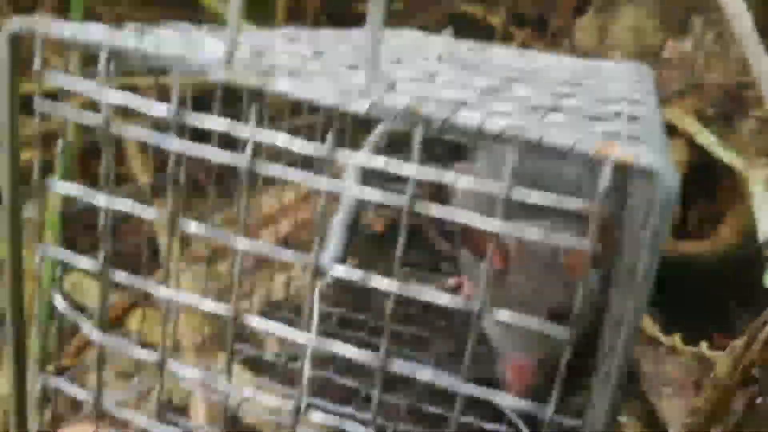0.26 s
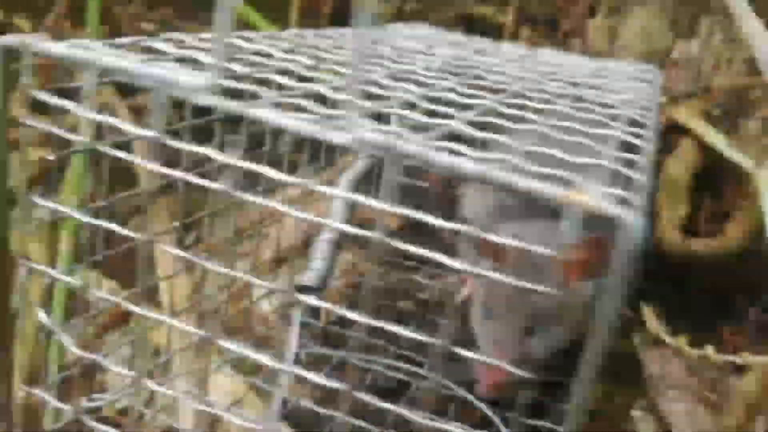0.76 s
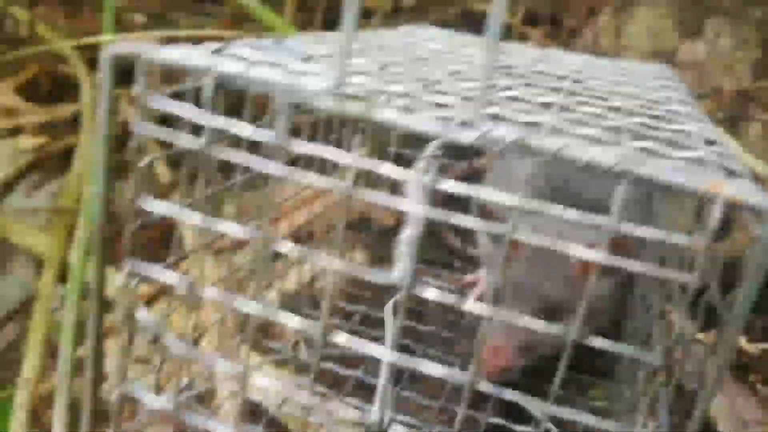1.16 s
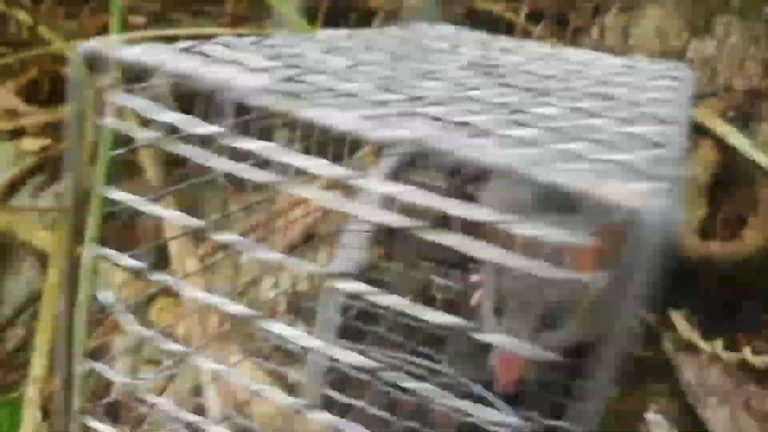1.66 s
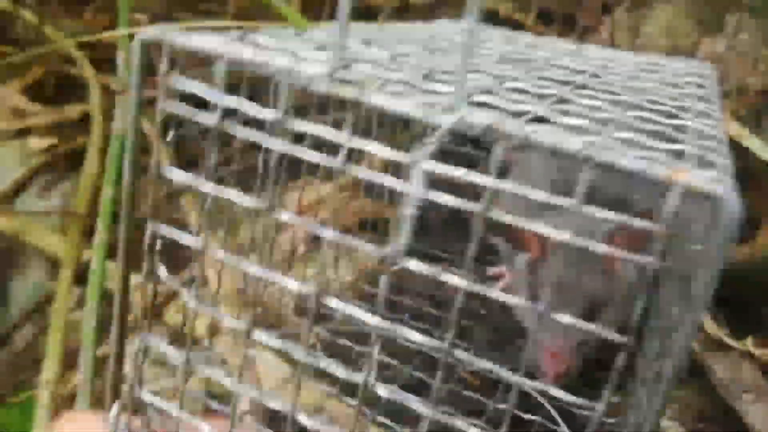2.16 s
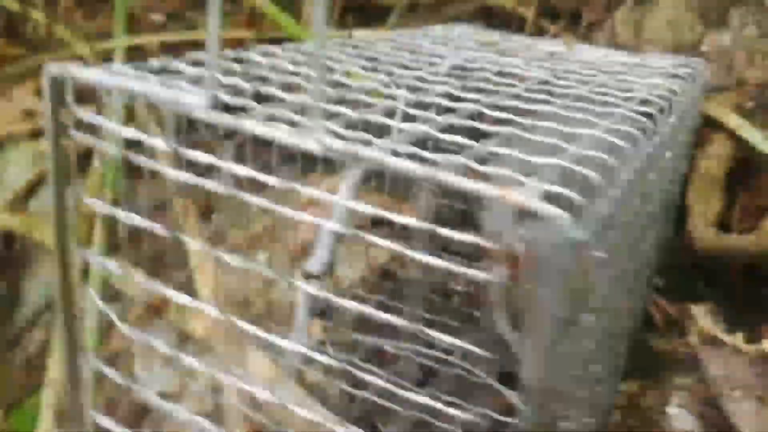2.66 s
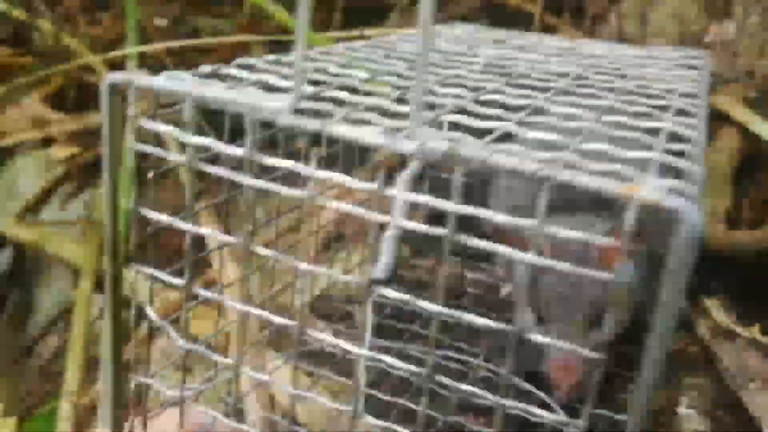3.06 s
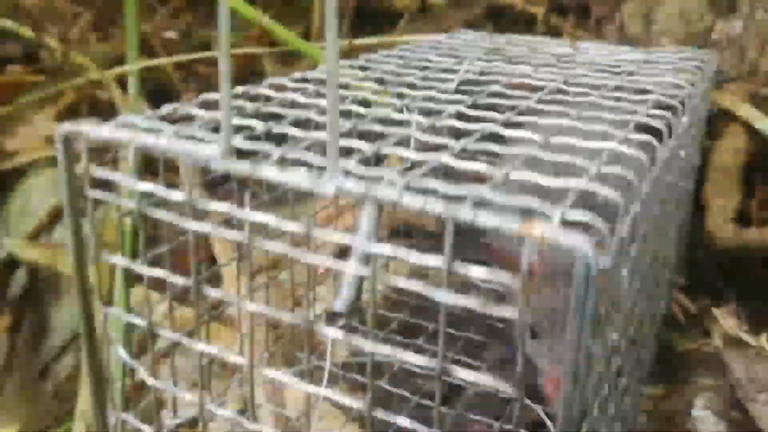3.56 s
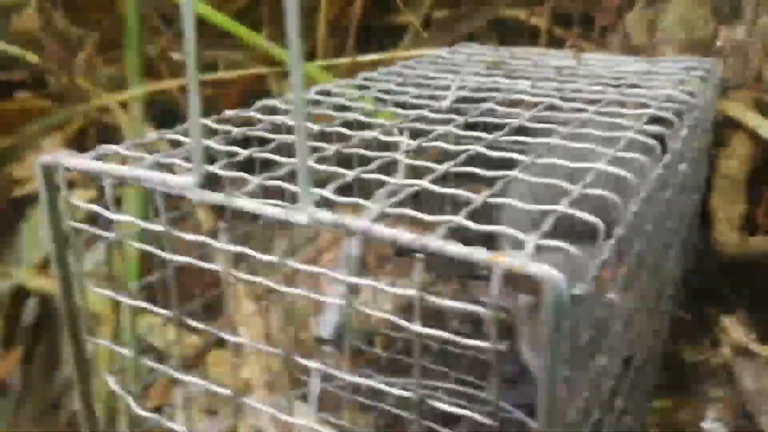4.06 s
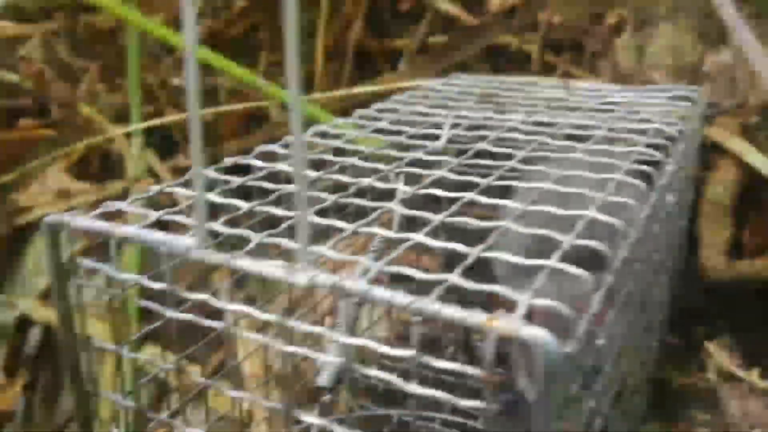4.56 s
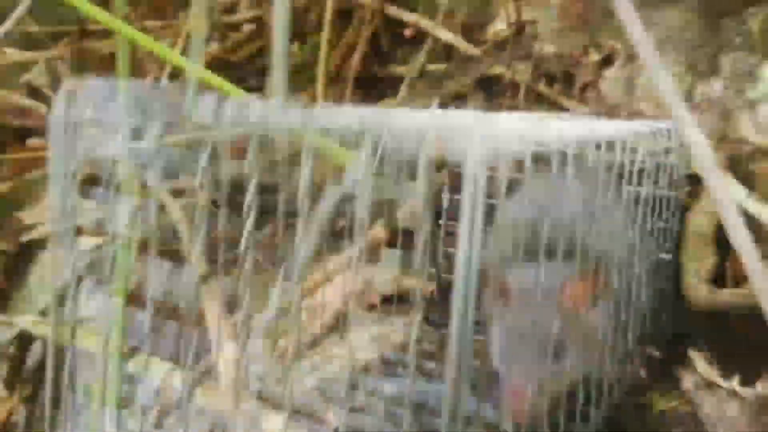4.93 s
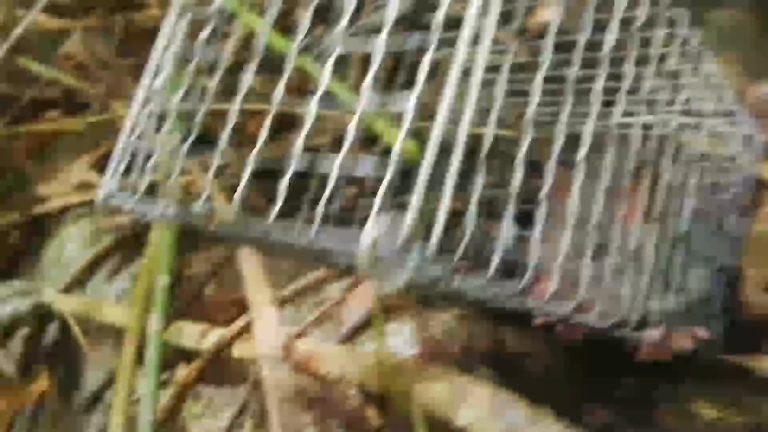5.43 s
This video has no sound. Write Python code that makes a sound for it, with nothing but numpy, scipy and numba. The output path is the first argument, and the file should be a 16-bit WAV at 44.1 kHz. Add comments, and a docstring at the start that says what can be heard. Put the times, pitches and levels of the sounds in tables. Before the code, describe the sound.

Outdoors, close to a phone microphone, a metal cage trap holding a small animal gives off irregular, bright clicks and light rattles as it slides over dry stalks. An early hard knock leads to scattered ticks, a busier patch with ringing rods and soft thuds, a brief lull, and a final loud burst of scrapes and knocks. A distant engine hums low and insects sing faintly throughout.

```python
"""A wire-mesh cage trap is tilted and dragged on dry stalks while a small animal shifts inside it.
From the start, far insects sing over a low engine hum, stalks scrape the mesh and the wires tick.
After a second the frame knocks hard; a little later one stalk rubs softly along the wires.
Past three seconds, loose rods ring among more knocks and soft thuds. After a lull, the last second
brings the loudest scraping and knocking. A phone's two microphones hear it all."""
import sys
import numpy as np
from scipy import signal
from scipy.io import wavfile
from scipy.ndimage import uniform_filter1d
from numba import njit

SR = 44100
rng = np.random.default_rng(int(sys.argv[2]) if len(sys.argv) > 2 else 0)


def master(y):
    """Save y as 16-bit WAV."""
    cut = np.clip(np.atleast_2d(y).T, -1, 1)
    pcm = np.round(cut * 32767)  # scale
    wavfile.write(sys.argv[1], SR, pcm.astype(np.int16))


N = 250929
T = np.arange(N) / SR
SIDES = np.array([[1.], [-1.]])  # left, right; "pan" below is the left level minus the right, in dB


def gain(db):
    """Turns decibels into a number to multiply by."""
    return 10 ** (np.asarray(db) / 20)


def normalize(x):
    """Scales a sound to an average power of 1."""
    return x / np.sqrt(np.mean(x ** 2))


@njit
def resonate(x, hz, width):
    """A filter that lets the pitch hz through unchanged and weakens pitches further from it."""
    out = np.empty(len(x))
    band_state, low_state = 0., 0.
    tuning, damping = np.tan(np.pi * hz / SR), width / hz
    for i in range(len(x)):
        swing = (band_state + tuning * (x[i] + 1e-18 - low_state)) / (1 + tuning * (tuning + damping))
        band_state = 2 * swing - band_state
        low_state += 2 * tuning * swing
        out[i] = damping * swing
    return out


def band(x, hz, width, passes=2):
    """Keeps a band of pitches in each channel; more passes give it steeper edges."""
    for _ in range(passes):
        x = np.array([resonate(channel, float(hz), float(width)) for channel in x])
    return x


def noise(alike):
    """Left and right noise: unrelated when alike is 0, nearly the same when it is 1."""
    common, opposite = rng.standard_normal((2, N))
    alike = np.clip(alike, -.99, .99)
    return (np.sqrt(1 + alike) * common + np.sqrt(1 - alike) * opposite * SIDES) / np.sqrt(2)


def wander(rate):
    """A smooth random curve, mostly within -1 to 1, that heads for a new value rate times a second."""
    hold = int(SR / rate)
    steps = np.repeat(rng.standard_normal(N // hold + 1), hold)
    return 1.426 * uniform_filter1d(uniform_filter1d(steps, hold), hold)[:N]


def fade(size, fade_s):
    """A curve, size samples long, that drops 60 dB in the fade time fade_s."""
    return np.exp(-np.log(1000) * np.arange(size) / SR / max(fade_s, .002))


def place(out, start_s, sound, pan_db, lag=0):
    """Mixes a sound in at start_s; the left side is shifted by lag samples."""
    for side, start in enumerate((int(start_s * SR) + lag, int(start_s * SR))):
        piece = (sound * gain(pan_db * SIDES / 2))[side, :N - start]
        out[side, start:start + len(piece)] += piece


def grains(size, rate, scatter_db, grain_s):
    """Tiny random impacts of uneven strength, about rate a second, each with a short tail."""
    timing, strength = rng.random((size, 2)).T
    hits = (timing < rate / SR) * gain(-scatter_db * np.log(1 - .93 * strength))
    return signal.lfilter([1], [1, -np.exp(-1 / (grain_s * SR))], hits)


def outdoor_air():
    """A soft outdoor rush in half-octave bands; its bass is alike on both sides."""
    # Each row: pitch in Hz, relative level in dB.
    spectrum = [(20, -16), (50, 0), (85, 4), (120, 0), (170, -7), (300, -15), (570, -30), (1100, -27),
                (2500, -26.5), (5000, -27.5), (9000, -42), (14500, -39), (16000, -40)]
    pitches, levels = np.transpose(spectrum)
    rush = 0
    for hz in 25 * 2 ** np.arange(0, 9.4, .5):
        db = np.interp(np.log(hz), np.log(pitches), levels) + 1.2 * wander(5.8)
        alike = 1.15 / (1 + (hz / 330) ** 4) - .15
        rush += gain(db) * band(noise(alike), hz, width=hz / 2.3)
    return gain(-60) * normalize(rush)


def insects():
    """A distant chorus blurs into narrow, slightly flickering bands."""
    # Each row: pitch in Hz, width in Hz, relative level in dB.
    voices = [(6406, 130, -3.5), (6667, 220, -0.5), (6920, 870, -2), (13000, 600, -28)]
    song = sum(gain(db + 1.2 * wander(49)) * normalize(band(noise(0.023), hz, width))
               for hz, width, db in voices)
    return gain(-65 + 0.6 * wander(0.86)) * normalize(song)


def engine_hum():
    """A far engine fires in a wavering low tone, with a weak tone an octave above."""
    # Each row: time in seconds, level in dB.
    loudness = [(0.0, -61), (0.05, -56.5), (0.38, -54), (0.41, -62), (1.11, -53.5), (1.14, -74),
                (1.31, -49), (1.57, -62), (1.73, -48), (1.77, -57.5), (2.06, -53), (2.19, -58),
                (3.0, -54.5), (3.04, -68), (3.15, -50.5), (3.33, -62), (3.42, -53), (3.53, -67.5),
                (3.68, -55), (3.74, -82), (3.79, -61.5), (3.96, -52), (4.12, -65.5), (4.23, -51.5),
                (4.39, -61.5), (4.63, -52.5), (4.69, -64), (5.04, -49.5), (5.09, -66), (5.48, -50),
                (5.56, -59), (5.69, -49)]
    times, levels = np.transpose(loudness)
    firing_hz = 84.4 + 0.74 * wander(1.467) + 1.42 * wander(12)
    phase = 2 * np.pi * np.cumsum(firing_hz) / SR
    tone = np.sin(phase) + gain(-19 + 4.1 * wander(4.63)) * np.sin(2 * phase)
    return np.sqrt(2) * gain(np.interp(T, times, levels) + 0.84 * wander(20)) * tone


def ground_rumble():
    """The frame rumbles as it drags over the ground."""
    # Each row: time in seconds, level in dB.
    loudness = [(0, -73.5), (.5, -77), (1.1, -61.5), (1.4, -70.5), (1.8, -65.5), (2.3, -72), (3.5, -67.5),
                (4.4, -74.5), (4.9, -65), (5.2, -58.5), (5.5, -60), (5.69, -51.5)]
    times, levels = np.transpose(loudness)
    db = np.interp(T, times, levels) + 3.85 * wander(22.984)
    bass = normalize(band(noise(0.62), hz=151, width=210))
    deep_bass = normalize(band(noise(0.77), hz=36, width=62))
    return gain(db) * (bass + 0.27 * deep_bass)


def soft_thuds():
    """The animal's feet, and the frame on the ground, make low tones that die at once."""
    # Each row: start in seconds, level in dB, pitch in Hz, pan in dB.
    thuds = [(0.728, -50, 202, -2), (1.141, -55, 175, 0), (1.788, -44, 172, 0), (1.831, -53, 290, -4),
             (3.373, -52, 190, 2), (3.512, -48, 440, 8), (3.639, -49, 262, -2), (4.592, -54, 171.5, -2),
             (4.7528, -44, 332, -2), (5.279, -46, 173, 2), (5.531, -35, 220, -1), (5.659, -55, 191, -3)]
    out, t = np.zeros((2, N)), np.arange(4000) / SR
    for start, db, hz, pan_db in thuds:
        tone = np.sin(2 * np.pi * (hz * t + 0.51 * rng.random((2, 1))))
        shape = np.minimum(t / 0.0006, 1) * fade(len(t), fade_s=0.031)
        place(out, start, 0.91 * gain(db) * tone * shape, pan_db)
    return out


def stalk_pressure(rate, grit):
    """Stalks catch and let go: a flickering push with uneven grains on top."""
    crackle = 2.6 * grit * grains(N, rate, scatter_db=6, grain_s=0.00075)
    return (5.5 + crackle) * gain(2.4 * grit * wander(90))


def sliding_stalk():
    """One stalk rubs softly along the wires and makes them sing at two pitches."""
    # In order: start, rise time, hold time and release time, all in seconds.
    timing = (2.27, .12, .2, .12)
    # Each row: pitch in Hz, width in Hz, relative level in dB.
    wire_tones = [(3630, 180, 2), (4800, 180, -1)]
    shape = np.interp(T, np.cumsum(timing), [0, 1, 1, 0])
    rub = stalk_pressure(rate=150, grit=0.21) * noise(.1)
    song = sum(gain(db) * band(rub, hz, width, passes=1) for hz, width, db in wire_tones)
    return gain(-65) * shape * normalize(song)


def drag_levels():
    """The dragging's hiss level, rasp level and pan at every sample."""
    # Each row: time in seconds, thin stalks' hiss in dB, thick stalks' rasp in dB, pan in dB.
    drag = [(0.0, -67.5, -64.5, -1), (0.41, -75, -71, -1), (0.602, -68, -70, -1.5),
            (0.731, -60, -62.5, -0.5), (0.86, -60, -61, -2.5), (0.96, -54.5, -53, -5),
            (0.985, -67.5, -61, 0), (1.008, -63, -62, -4), (1.04, -48.5, -53.5, 1),
            (1.2, -62.5, -61.5, -2.5), (1.41, -66, -71.5, 0), (1.7, -65.5, -65.5, -0.5),
            (1.839, -60, -58.5, -1.5), (1.901, -67, -71, -2), (2.001, -60, -55, -2),
            (2.162, -68.5, -72, -0.5), (2.362, -69.5, -65.5, -1), (2.622, -62.5, -60.5, 0),
            (2.77, -62, -60.5, -0.5), (2.92, -73.5, -64.5, 0.5), (3.2, -69, -72.5, -3),
            (3.33, -69.5, -59, -0.5), (3.403, -63, -63.5, 0), (3.424, -51, -58.5, -1), (3.53, -56, -58, 1),
            (3.64, -59.5, -56, -0.5), (3.84, -65.5, -64.5, -1), (4.22, -67, -64, -0.5),
            (4.423, -78, -71.5, -1), (4.88, -72, -70.5, 1), (5.01, -64.5, -53.5, 0),
            (5.13, -63, -48.5, -0.5), (5.21, -60.5, -58.5, -1.5), (5.34, -50.5, -49.5, -1),
            (5.47, -54, -55.5, -1), (5.584, -57, -52, -2), (5.6, -44, -47, -3.5), (5.69, -44, -45.5, -1)]
    times, *columns = np.transpose(drag)
    return [np.interp(T, times, column) for column in columns]


def scraping_stalks():
    """Dry stalks slip along the mesh: thin ones hiss, thick ones rasp lower down."""
    hiss_db, rasp_db, pan_db = drag_levels()
    grit = np.clip((hiss_db + 74) / 16, .15, 1)  # harder dragging crackles more
    thin, thick = stalk_pressure(rate=270, grit=grit), stalk_pressure(rate=130, grit=grit)
    both = np.sqrt(thin * thick)
    upper_hiss = gain(0.89 * wander(24.73)) * normalize(band(thin * noise(0.023), 10700, 12000))
    lower_hiss = gain(2.4 * wander(25.13)) * normalize(band(both * noise(0.027), 7500, 11000))
    hiss = gain(hiss_db) * (upper_hiss + lower_hiss) / np.sqrt(2)
    rasp_bands = [gain(4 * wander(70)) * normalize(band(thick * noise(0.018), hz, width=hz / 2))
                  for hz in (2160, 3110, 3580, 4330, 5470)]
    rasp = gain(rasp_db) * normalize(sum(rasp_bands))
    body_db = -65.5 + 0.93 * (rasp_db + 63.5) + 2.4 * wander(60)  # swells along with the rasp
    body = gain(body_db) * normalize(band(np.sqrt(thick) * noise(-0.055), 1173, 1390))
    return (hiss + rasp + body) * gain(pan_db * SIDES / 2)


def ringing_rods():
    """A loose rod bends in two directions at almost the same pitch, so its ring pulses."""
    # Each named rod: pitch in Hz, pulses per second, pulse depth from 0 to 1.
    rods = {"door": (12765, 9, .3), "trigger": (5782, 8, .3), "handle": (12005, 12, .2)}
    # Each row: start in seconds, rod name, level in dB, fade time in seconds, pan in dB.
    blows = [(0.553, "door", -39, 0.056, 10), (.868, "handle", -52, .08, 3),
             (1.0895, "door", -44.5, 0.15, 25.5), (1.195, "door", -64, .9, 8),
             (1.091, "trigger", -53, 0.097, 2), (1.756, "handle", -42, .07, 0),
             (1.769, "door", -53, 0.093, 7), (2.676, "handle", -50, 0.082, 17),
             (2.734, "handle", -52, 0.082, -11), (2.822, "door", -48, 0.13, 16),
             (2.907, "trigger", -63, 0.45, 1), (3.252, "door", -54, 0.09, 6), (3.29, "door", -40, 0.13, 0),
             (3.29, "trigger", -42, 0.15, 2), (3.439, "door", -47, 0.17, 6),
             (3.44, "trigger", -56, 0.94, -1), (3.556, "door", -46, 0.11, 10),
             (3.556, "trigger", -51, 0.29, 2), (3.674, "handle", -41, 0.075, 7),
             (3.752, "handle", -58, 0.067, 2), (4.272, "door", -68, 0.18, 2),
             (4.272, "trigger", -51.5, 0.77, 2)]  # the fade is short where a stalk touches the rod
    out, t = np.zeros((2, N)), np.arange(24000) / SR
    for start, rod, db, fade_s, pan_db in blows:
        hz, pulse_hz, depth = rods[rod]
        pulsing = 1 - depth * np.cos(2 * np.pi * (pulse_hz * t + 0.16))
        shape = np.minimum(t / 0.0014, 1) * fade(len(t), fade_s)
        tone = np.sin(2 * np.pi * (hz * t + rng.random((2, 1)) / 4))
        place(out, start, gain(db) * tone * pulsing * shape, pan_db)
    return out


def frame_knocks():
    """A blow cracks, then rings the frame's own tones, most of all near the struck spot's pitch."""
    # Each row: start in seconds, level in dB, the spot's pitch in Hz, pan in dB, softness of the
    # blow in dB lost per octave above that pitch, ring length as a multiple of a free blow's.
    knocks = [(0.253, -51, 1220, -8, 9, .9), (0.788, -48.5, 1880, -12, 9, 0.96),
              (1.0552, -29, 1190, 0, 1, 1.07), (1.143, -44, 298, 1, 11, 0.7),
              (1.7715, -39.5, 1700, 0, 8, 0.92), (1.963, -45, 1270, -5, 5.3, 0.73),
              (2.122, -47.5, 1510, -3, 14, 1.5), (2.214, -54, 1410, -6, 9, .9),
              (2.69, -52, 1250, -5, 20, .6), (2.6974, -39, 1260, 2, 6, .8),
              (2.809, -45.5, 1500, -6, 8.6, .8), (2.927, -40.5, 1360, -6, 6.5, 0.64),
              (3.376, -49, 700, 2, 9, .9), (3.4142, -39.5, 1530, -6, 9, 0.52), (3.448, -51, 1200, 0, 9, .8),
              (3.469, -50, 900, 5, 12, .8), (3.5175, -47, 885, 21, 11, 0.5), (3.562, -67, 1000, -3, 9, .9),
              (3.632, -51, 1210, -2, 9, .8), (3.743, -47, 1350, 0, 15, 1.05), (3.825, -49, 860, 0, 4, 1.5),
              (3.921, -50, 1090, 0, 7, 0.81), (4.02, -52, 1300, 1, 9, .8), (4.051, -43, 960, -10, 6, 0.86),
              (4.0518, -36.5, 2870, -4, -1, 1.4), (4.066, -50, 850, 9, 8.8, 1.3),
              (4.1, -52, 1211, 4, 2, .9), (4.214, -58, 1300, -2, 9, .9), (4.308, -53, 880, -6, 3, .9),
              (4.517, -51.5, 1090, -2, 22, 0.77), (4.7516, -39.5, 780, 1, 30, 0.95),
              (5.078, -38, 1040, -7, 18, .9), (5.19, -46, 1400, 0, 17, 1.2), (5.245, -47, 1260, 7, 5, .7),
              (5.276, -40.5, 1220, -2, 6.9, 0.7), (5.2988, -24.5, 1550, -2, 5.4, 0.44),
              (5.327, -32, 2410, -17, 3, 0.41), (5.372, -42, 1780, 2, 7, .9),
              (5.53, -31.5, 318, -7, 10, 0.66), (5.621, -36, 1147, -4, 11, .9),
              (5.647, -51, 900, -3, 9, .9)]
    # Each row: pitch in Hz, relative level in dB, ring length as a multiple of the blow's.
    frame_tones = [(312, 0, 1.6), (469, 0, 1.4), (810, 1, 0.81), (1070, -3.5, 1.27), (1253, 1, 1.24),
                   (1522, 3, 0.77), (1903, -1.5, 1.13), (2470, 1.5, 0.57), (2940, 2.5, 0.61),
                   (3326, -3, .8), (3600, -4.5, 0.78), (4560, 3, .35), (5820, 3.5, 0.77), (6310, 8, 0.38)]
    size = 5000
    out, t = np.zeros((2, N)), np.arange(size) / SR
    rise = np.minimum(t / 0.00078, 1)
    for start, db, spot_hz, pan_db, softness, blow_length in knocks:
        offsets = rng.random((2, len(frame_tones)))  # put the two sides out of step
        detune = 1 + .015 * rng.standard_normal(len(frame_tones))
        burst = rng.standard_normal(size) * fade(size, fade_s=.008) * np.ones((2, 1))
        crack = band(burst, hz=np.sqrt(spot_hz * 1700), width=2200)
        place(out, start, gain(db + 2 - 0.56 * softness) * crack, pan_db)
        for k, (hz, tone_db, tone_length) in enumerate(frame_tones):
            # Loose parts of the frame rattle against each other.
            rattle = 1 + .35 * normalize(uniform_filter1d(rng.standard_normal(size), size=60))
            octaves = np.log2(hz / spot_hz)
            falloff_db = -softness * max(octaves, 0) + 21 * min(octaves, 0)
            cycles = hz * detune[k] * t + 0.48 * offsets[:, [0]] + .2 * offsets[:, [k]]
            tone = 0.86 * gain(db + tone_db + falloff_db) * np.sin(2 * np.pi * cycles)
            length = blow_length * tone_length
            tail = fade(size, length * .016) + .3 * fade(size, length * .076)  # a little rings on
            place(out, start, tone * rattle * rise * tail, pan_db)
    return out


def faint_ticks(count):
    """Rows for wire_ticks: small random contacts, more frequent and louder under hard dragging."""
    hiss_db = drag_levels()[0]
    activity = np.cumsum(gain(0.3 * hiss_db))
    chance = rng.random((count, 4))
    starts = np.searchsorted(activity / activity[-1], (np.arange(count) + chance[:, 0]) / count * .98)
    return [(i / SR, hiss_db[i] + 10 + 6 * strength, -16 * brightness, -14, .04, 12 * side - 7)
            for i, (strength, brightness, side) in zip(starts, chance[:, 1:])]


def wire_ticks():
    """Wires meet with a sharp snap, then chatter on as the mesh hisses away."""
    # Each row: start in seconds, treble level in dB, lower band in dB relative to the treble,
    # chatter in dB relative to the snap, chatter fade time in seconds, pan in dB.
    clear_ticks = [(0.0487, -22, -22.5, -14, 0.1, -6), (0.068, -44, 2, -0.5, 0.097, 0),
                   (0.2403, -29.5, -26, -10, 0.053, -2), (0.554, -30.5, -20, -11, 0.1, 2),
                   (0.5883, -43.5, -11, 2, 0.051, 1), (0.79, -43.5, -1, -9, 0.19, -7),
                   (.803, -36, -5, -11, .04, 1), (0.8186, -37, -3, -6.5, 0.82, 0),
                   (.832, -45, -6, 0, .05, -3), (0.8542, -28, -20, -22, .15, -16),
                   (0.8673, -29, -16, -8, 0.043, -5), (0.9091, -45, 3, -1.5, 0.39, -1),
                   (0.9432, -25, -10, -13, 0.097, -5), (0.9626, -33, -3.5, 6, 0.025, -5.5),
                   (1.012, -43.5, -14, -1, 0.62, 4), (1.046, -43, -6, 4, 0.06, 6),
                   (1.0547, -20.5, 0, -7, 0.042, -1.5), (1.091, -38, -11, -2, 0.036, -2),
                   (1.1516, -42, -0.5, -20, 0.093, -18), (1.182, -44, -14, -26, .15, 0),
                   (1.1938, -30.5, -12.5, -1.5, 0.054, -0.5), (1.424, -41.5, 1, -3.5, 0.089, -3),
                   (1.7227, -38, -12, -6, 0.14, 1), (1.754, -45.5, -11, 2, 0.08, -1),
                   (1.7685, -35, -11.5, 2, 0.14, -1.5), (1.796, -35, -4, -2, 0.023, -3),
                   (1.808, -42, -9, 4.5, 0.093, 0), (1.9612, -55, 15, -10, 0.04, -10),
                   (1.9929, -38, -22, -1, 0.13, -1), (2.046, -47, -18, 2, 0.04, -1),
                   (2.1572, -38.5, -4.5, -24, .031, -6.5), (2.213, -51, 4.5, 1, 0.038, -2),
                   (2.6463, -36, -7.5, 1, 0.05, -2), (2.676, -47, 1, -1.5, 0.14, 1),
                   (2.7345, -43, -19, -1, 0.042, 2), (2.8085, -31.5, -15.5, -10.5, 0.23, -2),
                   (2.8327, -38, -21, 3, 0.04, 1), (2.9083, -42, -12, -5.5, 0.13, 1),
                   (3.0883, -37, -23, -4.5, 0.062, 1), (3.276, -34.5, -13, -7, 0.15, -2),
                   (3.293, -36, -12, -2, 0.13, 2), (3.385, -45, -21, -3, .03, 2),
                   (3.415, -46.5, 11, -9, 0.056, -1), (3.4375, -28.5, -22, -5.5, 0.097, 3.5),
                   (3.449, -40, -14, -2, 0.16, -1), (3.484, -43.5, 2, -1, 0.28, -1),
                   (3.532, -49, -3, -3, .031, 2), (3.5549, -33, -25, -1, 0.041, 0),
                   (3.627, -42.5, -4, 2.5, 0.056, -7), (3.674, -43, -17, 3, 0.038, -3),
                   (3.733, -50, 4.5, 4.5, 0.074, 1), (3.786, -42, -15, -6, 0.07, 1),
                   (3.8229, -28, -38.5, -6, 0.076, 1), (4.051, -18, -10, -3, 0.069, 1),
                   (4.0534, -18, -18, -14, .04, -9), (4.2072, -45, 3, -15, .031, -5),
                   (4.272, -28, -5.5, -9, 0.13, -2.5), (4.289, -34, -18, -21, .025, -5),
                   (4.963, -39, -13, -3, 0.16, 1), (5.013, -30, -1, -14, 0.18, -2),
                   (5.018, -45, -18, -13, .03, 0), (5.0506, -38, -15, -8, .03, -3),
                   (5.057, -42, -4, -1, 0.42, -4), (5.081, -39, -9, 0, 0.37, 0.5),
                   (5.101, -39, -6, -4, 0.082, 1), (5.1538, -40, -9, -15, .03, -12),
                   (5.2075, -39.5, -8, -8, .03, -9), (5.2441, -41, 1, -2.5, 0.18, 1),
                   (5.265, -38, -6, -8, 0.12, 12), (5.283, -44.5, 9, 3.5, 0.13, -5),
                   (5.299, -21, -12, -5.5, 0.093, 1), (5.318, -35, -14, 1, 0.043, 0),
                   (5.327, -16.5, -14, -25, 0.053, -12.5), (5.486, -44, -8, -2, 0.051, -1),
                   (5.509, -39, -11, 0, 0.044, -11), (5.5155, -38, -14, -4, .03, -9),
                   (5.522, -30.5, -5, -4.5, 0.17, -11.5), (5.591, -35.5, 2, -4, 0.53, -1),
                   (5.6126, -24.5, -20, -2, 0.024, -10), (5.621, -20, -15, -9, 0.025, -10),
                   (5.629, -36, 2, -12, .03, -2), (5.655, -36, -4, 2, 0.09, 0),
                   (5.686, -29, -1.5, 4, .05, -2)]
    size = 6000
    out, t = np.zeros((2, N)), np.arange(size) / SR
    strike = 3.64 * np.clip((t - .0004) / .0001, 0, 1) * np.exp(-t / .0005)
    lower_fade = .65 + .35 * fade(size, fade_s=0.0034)  # the lower band loses some chatter early
    for start, db, lower_db, chatter_db, fade_s, pan_db in clear_ticks + faint_ticks(count=60):
        roughness = 0.71 * rng.standard_normal(size) + 0.3 * rng.standard_normal((2, size))
        snap = strike * roughness
        snap *= np.sqrt(np.sum(strike ** 2) / np.sum(snap ** 2, axis=1, keepdims=True))  # same energy
        bounces = 0.64 + 0.23 * grains(size, rate=690, scatter_db=5, grain_s=0.0013)
        tail = fade(size, fade_s) + 0.14 * fade(size, 3 * fade_s)
        chatter = gain(chatter_db) * bounces * np.minimum(t / 0.0029, 1) * tail * roughness
        # A duller tick has more of the lower band, and both bands drop in pitch.
        treble_hz, lower_hz = 8390 - 130 * lower_db, 4250 - 113 * lower_db
        treble = band(snap + chatter, treble_hz, width=11900)
        lower = band(snap + chatter * lower_fade, lower_hz, width=1.1 * lower_hz)
        tick = 1.18 * gain(db) * treble + 2.09 * gain(db + lower_db) * lower
        # Each contact sets a few short lengths of wire ringing.
        ring = sum(band(tick, hz, width=100, passes=1) for hz in rng.uniform(3500, 25000, size=5))
        place(out, start, tick + 0.13 * ring, pan_db, lag=int(rng.integers(-12, 24)))
    return out


def scene():
    """The moving trap close by, with the engine, insects and air behind it."""
    mesh = wire_ticks() + scraping_stalks() + sliding_stalk()
    trap = mesh + frame_knocks() + soft_thuds() + ringing_rods() + ground_rumble()
    return trap + engine_hum() + insects() + outdoor_air()


def record(dry):
    """Each microphone opening boosts its own band of treble; the highest pitches are cut steeply."""
    # Each row, left then right: pitch in Hz, width in Hz, boost in dB.
    openings = [(13700, 4100, 9.5), (10430, 4600, 6)]
    boosted = [channel + (gain(db) - 1) * resonate(channel, float(hz), float(width))
               for channel, (hz, width, db) in zip(dry, openings)]
    cutoff_hz = 15800
    return signal.sosfilt(signal.ellip(8, .2, 70, cutoff_hz, fs=SR, output="sos"), boosted)


dry = scene()
out = record(dry)
master(out)
```